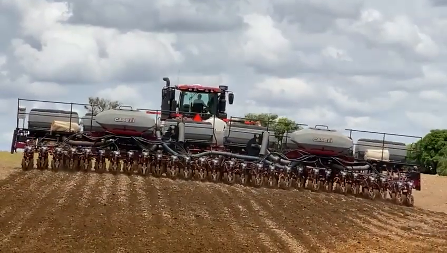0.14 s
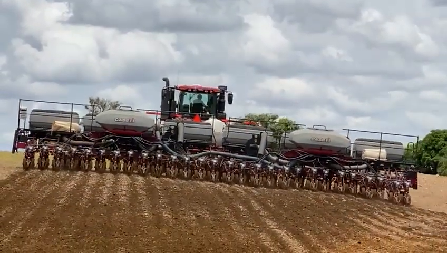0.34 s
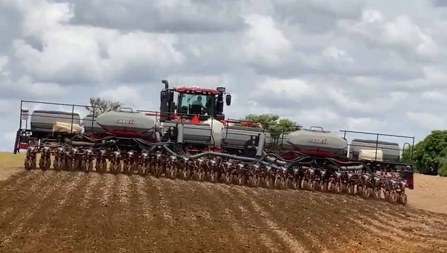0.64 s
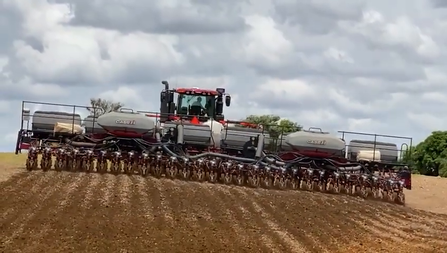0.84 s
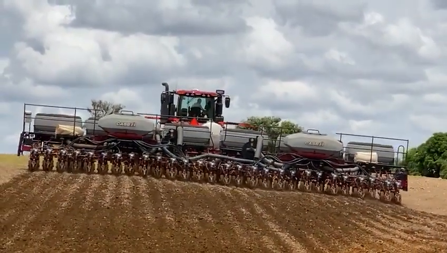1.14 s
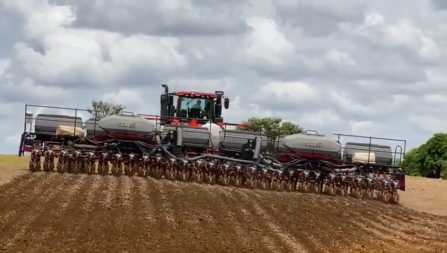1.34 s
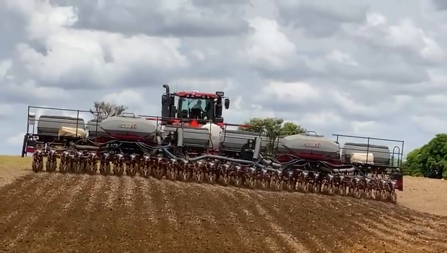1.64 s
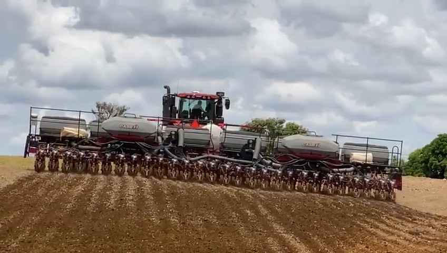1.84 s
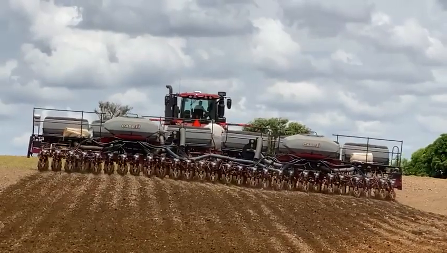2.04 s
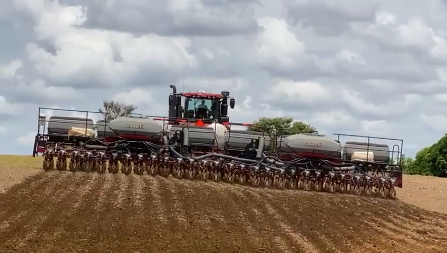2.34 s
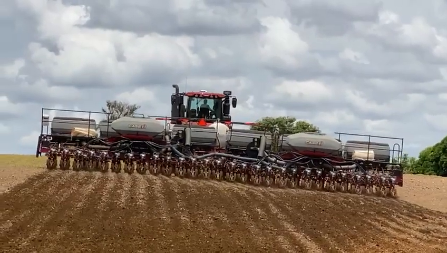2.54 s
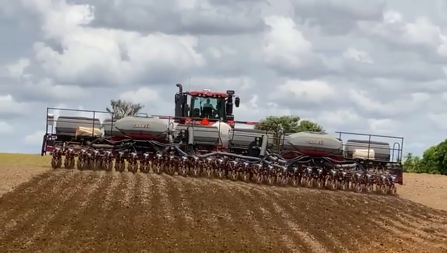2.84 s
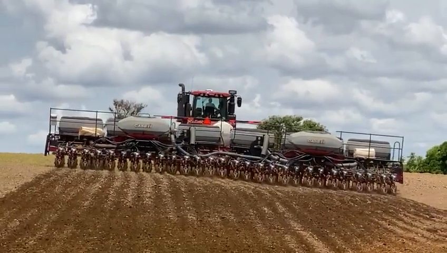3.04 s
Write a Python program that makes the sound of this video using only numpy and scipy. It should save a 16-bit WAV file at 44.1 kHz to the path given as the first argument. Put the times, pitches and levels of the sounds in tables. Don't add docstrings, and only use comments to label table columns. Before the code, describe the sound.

Tractor-drawn planter drones away across a field, fan drives whining and beating amid disc squeaks

```python
import sys
import numpy as np
from scipy import signal
from scipy.fft import rfft, irfft
from scipy.io import wavfile
from scipy.ndimage import uniform_filter1d

SR = 44100
rng = np.random.default_rng(int(sys.argv[2]) if len(sys.argv) > 2 else 0)


def linear_from_db(decibels):
    return 10 ** (np.asarray(decibels, float) / 20)


def store_pcm(level_fs):
    pcm = np.round(np.clip(level_fs, -1, 1) * 32767).astype(np.int16)
    wavfile.write(sys.argv[1], SR, np.atleast_2d(pcm).T)


N = 141120
T = np.arange(N) / SR
HZ = np.fft.rfftfreq(N, 1 / SR)

# start in seconds, length in seconds.
GUSTS_S = [
    (0.067, 0.032),
    (0.555, 0.22),
    (0.95, 0.11),
    (1.227, 0.2),
    (1.652, 0.673),
    (2.482, 0.37),
    (2.978, 0.14),
]
# frequency in Hz, density in dB per Hz.
RUMBLE_HZ_DB = [(22, -94), (40, -66.5), (62, -60.5), (110, -57), (170, -58.5), (240, -64), (310, -72),
                (390, -77)]
# multiple of the four-stroke cycle rate, level in dB rms.
EXHAUST_ORDER_DB = [(4, -58), (6, -38), (7, -47), (9, -46.5), (13, -57)]
# start in seconds, frequency in Hz, peak in dB, length in seconds.
BUMPS = [
    (.075, 90, -27, .03),
    (2.002, 74, -25, .065),
    (2.105, 85, -28, .035),
    (2.055, 60, -29, .05),
    (2.26, 90, -28, .025),
    (2.31, 90, -28, .025),
    (2.385, 80, -28, .035),
]
# time in seconds, level of the rush in dB.
RECEDE_S_DB = [(0.0, -36), (2.35, -39.5), (3.2, -38.5)]
# frequency in Hz, density in dB per Hz.
ROAR_HZ_DB = [(390, -80.5), (480, -70), (750, -69), (930, -71), (1030, -67.5), (1250, -69), (1400, -63),
              (1470, -76)]
# frequency in Hz, density in dB per Hz.
HISS_HZ_DB = [(1470, -78.5), (1570, -69.5), (1800, -70), (2150, -70.5), (2500, -75), (4000, -78),
              (6000, -81), (7900, -85)]
# centre in Hz, width in Hz, level in dB
CHATTER = [(3510, 370, -51.5), (2950, 370, -53), (1597, 87, -48), (1036, 42, -53)]
# start in seconds, length in seconds, pitch in Hz, peak in dB.
DISC_SQUEAKS = [(0.232, 0.076, 4870.0, -41), (0.299, 0.05, 3480, -34.5), (0.351, 0.031, 2825.0, -37),
                (0.374, 0.071, 3180, -35), (0.377, 0.07, 6470, -41.5), (0.409, 0.114, 3500, -36.5),
                (0.496, 0.036, 7088.0, -38), (0.743, 0.043, 6900, -41), (0.83, 0.065, 4950, -31.5),
                (0.923, 0.055, 4330, -40), (0.946, 0.066, 3568.0, -38), (1.045, 0.049, 3300.0, -36.5),
                (1.054, 0.04, 6742.0, -44), (1.07, 0.051, 3480, -27.5), (1.202, 0.039, 2980, -35),
                (1.472, 0.064, 2990, -33.5), (1.489, 0.11, 4975.0, -43), (1.521, 0.055, 3420, -35),
                (1.55, 0.051, 6120, -37.5), (1.66, 0.027, 3447.0, -33.5), (1.794, 0.052, 3370, -37.5),
                (1.797, 0.035, 6760, -43), (1.855, 0.067, 3360, -38.5), (2.514, 0.038, 6120, -42),
                (2.612, 0.046, 4920, -42), (2.644, 0.044, 3300, -36.5), (2.694, 0.052, 4020, -44),
                (2.72, 0.069, 3360, -37.5), (3.039, 0.053, 4830, -43), (3.053, 0.067, 3420, -38.1),
                (0.067, 0.037, 3300, -35.5), (0.104, 0.051, 3410, -38), (0.164, 0.041, 3350, -41),
                (0.264, 0.056, 3300, -39), (.335, .04, 5350, -44), (.415, 0.038, 6600, -41),
                (.5, 0.045, 3440, -32.5), (.6, 0.05, 2950, -53), (1.056, 0.1, 2950, -41),
                (1.123, 0.068, 3380, -37), (1.175, 0.046, 3560, -41), (1.214, 0.063, 3280, -40),
                (1.291, 0.029, 3330, -39.5), (1.6, 0.055, 3490, -39.5), (1.963, 0.033, 3330, -42),
                (2.089, 0.052, 3450, -38.5), (2.157, 0.049, 3330, -39), (2.393, 0.055, 3425, -43),
                (3.157, 0.034, 7400, -47)]
# start in seconds, length in seconds, pitch in Hz, peak in dB.
LOW_SQUEAKS = [(0.036, 0.046, 2650, -35.5), (0.067, 0.026, 2990, -37), (.375, .03, 3509, -36),
               (.375, .05, 2820, -40), (.835, 0.052, 2971, -43), (.92, 0.045, 3423, -39),
               (1.108, 0.048, 3057, -40), (1.295, .03, 2756, -52), (1.42, .05, 3550, -40.5),
               (1.563, .035, 3460, -43), (1.693, .05, 3350, -39), (1.825, .03, 3509, -40),
               (2.1, .035, 3531, -51), (2.175, .03, 2928, -47), (2.37, .03, 3746, -41),
               (2.549, 0.037, 3574, -38), (2.554, 0.033, 3294, -42), (2.601, 0.057, 3402, -37.5),
               (2.743, .03, 2950, -46), (2.79, 0.038, 3510, -47), (2.795, .035, 3014, -40),
               (2.802, 0.041, 3270, -44), (2.895, 0.048, 3370, -40), (3.012, 0.032, 3445, -48)]
# start in seconds, length in seconds, pitch in Hz, peak in dB.
HIGH_SQUEAKS = [(.155, .035, 5700, -44), (0.187, 0.033, 5404, -40.5), (.372, .045, 5641, -44),
                (.377, 0.046, 6244, -43), (.402, .035, 7000, -42), (0.48, .05, 7299, -51),
                (.5, .03, 6761, -48), (0.693, 0.025, 4000, -44), (.77, 0.027, 4866, -49),
                (1.663, 0.032, 6800, -49), (2.53, 0.065, 5297, -43), (2.618, 0.041, 5260, -44),
                (2.67, .025, 4970, -47), (2.72, .03, 4823, -46), (2.794, .035, 6800, -45),
                (3.056, 0.037, 6847, -47), (3.152, .04, 5146, -45)]
# frequency in Hz, level at start in dB, level at end in dB, unsteadiness in dB.
WHINES = [(62, -51, -50, 3), (161.6, -47, -48, 1.5), (186, -51, -51, 2), (746, -53, -63, 3),
          (1292.5, -49, -54, 3), (1357, -55, -52, 3), (4972, -64, -68, 4), (7100, -66, -71, 4)]
# time in seconds, piston rate in Hz, overtone change in dB, fundamental change in dB.
DRIVE_A = [(0, 702.7, -.5, 2), (.6, 702.3, -.5, 1.5), (1.2, 701.85, 0, 0), (1.8, 701.8, 0, 0),
           (1.95, 702.2, -1, -.5), (2.15, 702.5, -3.5, -.5), (2.45, 703.1, -5.5, -3), (2.75, 703.3, -6, -8),
           (3.2, 703.7, -8.5, -13)]
# time in seconds, rate above the first in Hz, overtone and fundamental change in dB.
DRIVE_B = [(0, 8.1, -10, 2), (.35, 7.9, -9, 2), (.8, 7.7, -9, 0), (1.1, 8, -9, -1), (1.3, 8, -6, 0),
           (1.45, 8, -12, -3), (1.7, 8, -18, -4), (1.8, 8, 2.5, -3), (2.1, 8, 1.5, -1), (2.38, 8, -2, -2),
           (2.48, 8, -11, -3), (2.58, 8, -3, -2), (2.92, 8, -4.5, -1), (3.05, 8, -14, -4)]
# time in seconds, rate above the first in Hz, the same two changes in dB.
DRIVE_C = [(0, 10.05, -10, -9), (.95, 9.9, -9, -9), (1.1, 9.3, -9, -9), (1.35, 9.3, -10, -9),
           (1.5, 9.3, -30, -20)]
# multiple of the piston rate, level in dB rms,
# share of the overtone change, share of the fundamental change.
A_TONES = [(1, -41, 0, 1), (2, -33.7, .95, 0), (3, -43.5, .9, .45), (4, -59, .9, 0), (5, -60, .9, 0)]
# multiple, level in dB rms, share of the overtone and fundamental change.
B_TONES = [(1, -48, 0, 1), (2, -40.5, 1, 0), (3, -59, .6, 0)]
# frequency in Hz, gain in dB.
COPY_GAIN_HZ_DB = [(7900, -21.5), (8600, -19), (9000, -26), (9600, -20), (10300, -19), (11000, -23),
                   (11150, -27.5), (12200, -15)]


def in_time(rows):
    s, *columns = np.transpose(rows)
    return [np.interp(T, s, c) for c in columns]


def at_hz(points, outside_db):
    f, db = np.transpose(points)
    return np.interp(np.log(HZ + 1), np.log(f), db, left=outside_db, right=outside_db)


def drift(rate_hz):
    r = np.exp(-80 * np.pi * rate_hz / SR)
    noise = rng.standard_normal(N // 40 + 2002)
    slow = signal.lfilter([1], [1, -2 * r, r * r], noise)[2000:]
    return np.interp(np.arange(N) / 40, np.arange(len(slow)), slow / slow.std())


def band(x, low_hz, high_hz):
    return signal.sosfilt(signal.butter(3, [low_hz, high_hz], "band", fs=SR, output="sos"), x)


def narrow(x, low_hz, high_hz):
    rise = np.clip((HZ - low_hz) / 40 + .5, 0, 1) ** 2
    fall = np.clip((high_hz - HZ) / 40 + .5, 0, 1) ** 2
    return irfft(rfft(x) * rise * fall, N)


def tone(hz, db, flutter_db, rate_hz, start_turn=None):
    start = rng.random() if start_turn is None else start_turn
    phase = 2 * np.pi * (np.cumsum(hz + 0 * T) / SR + start)
    phase = phase + 0.061 * flutter_db * drift(rate_hz)
    return np.sqrt(2) * linear_from_db(db + flutter_db * drift(rate_hz)) * np.sin(phase)


def air(spectrum, patchy_db, rate_hz):
    f = np.array(spectrum)[:, 0]
    shaped = rfft(rng.standard_normal(N)) * linear_from_db(at_hz(spectrum, -200)) * np.sqrt(SR / 2)
    third = 3 * np.log2((HZ + 1) / f[0])
    together = drift(4.3)
    out = np.zeros(N)
    for k in range(int(3 * np.log2(f[-1] / f[0])) + 2):
        piece = irfft(shaped * np.clip(1 - abs(third - k), 0, 1), N)
        out += piece * linear_from_db(patchy_db * (0.34 * together + drift(rate_hz)))
    return out


def breeze(engine_sound):
    gusts = sum(1. * (T > s) * (T < s + length_s) for s, length_s in GUSTS_S)
    gusts = uniform_filter1d(gusts, SR // 40)
    rumble = air(RUMBLE_HZ_DB, 1, 5) + .5 * engine_sound
    return gusts * linear_from_db(-18 + 3 * drift(4)) * narrow(rumble, 25, 290)


def engine():
    cycle_hz = 14.2
    out = air(RUMBLE_HZ_DB, 1.0, 1.7)
    for order, db in EXHAUST_ORDER_DB:
        out += tone(order * cycle_hz, db, 1.0, 3.0)
    for s, hz, db, length_s in BUMPS:
        u = np.clip((T - s) / length_s, 0, 1)
        out += linear_from_db(db) * np.sin(np.pi * u) ** 2 * np.sin(2 * np.pi * hz * (T - s))
    return out


def faint_squeaks():
    per_s, base_db = 60, -50
    when, length, pitch, level = rng.random((4, int(per_s * T[-1])))
    length_s = .03 + .05 * length
    hz = 3220 * 2.2 ** (.15 * pitch + .85 * pitch ** 9)
    db = base_db - 3 * when + 6 * level - 10 * pitch ** 3
    return np.c_[when * T[-1], length_s, hz, db]


def chatter(level_db):
    out = np.zeros(N)
    for hz, width_hz, db in CHATTER:
        ring = band(rng.standard_normal(N), hz - width_hz / 2, hz + width_hz / 2)
        out += linear_from_db(db + .5 * level_db + 2.3 * drift(5.5) + 1.9 * drift(13.5)) * ring / ring.std()
    return out


def discs(level_db):
    trim_db, rough, peak_at = -1.5, .27, .52
    wander_share, arch_per_s, sag = .007, .12, .005
    off_centre_share = .48
    skew = np.log(.5) / np.log(peak_at)
    loud = DISC_SQUEAKS
    squeaks = [*loud, *LOW_SQUEAKS, *HIGH_SQUEAKS, *faint_squeaks()]
    out, off = np.zeros(N), np.zeros(N)
    wander, grit = drift(16.8), drift(100.0)
    wander = wander - wander.mean()
    for k, (s, length_s, hz, db) in enumerate(squeaks):
        a, b = int(s * SR), min(int((s + length_s) * SR), N)
        at = (np.arange(a, b) + k * 9973) % N
        arch = np.sin(np.pi * np.linspace(0, 1, b - a) ** skew)
        bend = wander_share * wander[at] + arch_per_s * length_s * (arch - .8)
        bend = bend - sag * np.linspace(-.5, .5, b - a)
        level = linear_from_db(db + trim_db) * arch ** 0.7 * (1 + rough * grit[at])
        squeak = level * np.sin(2 * np.pi * np.cumsum(hz * (1 + bend)) / SR)
        out[a:b] += squeak
        if k < len(loud) and hz < 6300 and rng.random() < off_centre_share:
            off[a:b] += squeak
    return out + chatter(level_db), signal.hilbert(off).imag


def whines():
    return sum(tone(hz, a + (b - a) * T / T[-1], unsteady_db, 3.4) for hz, a, b, unsteady_db in WHINES)


def fan_drives():
    out = np.zeros(N)
    first_hz = 0
    drives = (DRIVE_A, A_TONES, 0), (DRIVE_B, B_TONES, -.11), (DRIVE_C, B_TONES, -.12)
    for k_drive, (curve, tones, turn) in enumerate(drives):
        hz, over_db, low_db = in_time(curve)
        hz = hz + first_hz
        if k_drive == 0:
            first_hz = hz
        for k, db, over_share, low_share in tones:
            level_db = db + over_share * over_db + low_share * low_db
            out += tone(k * hz, level_db, .55 * k, 7.0, k * turn)
    return out


def fan_width(mid, other_air, level_lag_s=.0006):
    late = np.roll(mid, int(level_lag_s * SR))
    mixed = linear_from_db(-9) * other_air + linear_from_db(-18) * late
    wide = narrow(linear_from_db(2.5 * drift(3.9)) * mixed, 1140, 1455)
    return wide + .4 * narrow(mid, 1270, 1315)


def scene():
    level_db, = in_time(RECEDE_S_DB)
    level_db = level_db - level_db.mean()
    roar, other_air = (linear_from_db(0.87 * level_db) * air(ROAR_HZ_DB, 0.31, 10.0) for _ in range(2))
    hiss = linear_from_db(level_db) * air(HISS_HZ_DB, 1.0, 9.3)
    engine_sound = engine()
    squeaks, off_centre = discs(level_db)
    mid = engine_sound + roar + hiss + squeaks + whines() + fan_drives()
    side = breeze(engine_sound) + fan_width(mid, other_air) + linear_from_db(-11) * off_centre
    return np.array([mid + side, mid - side])


def swell(x):
    power = x ** 2
    return np.sqrt(uniform_filter1d(power, int(.054 * SR)) / uniform_filter1d(power, SR // 2) + 1e-6)


def refill_top(dry):
    shift_hz, from_hz, top_edge_hz = 11 * SR / 64, 23 * SR / 128, 11910
    levelling, follow = .75, .35
    spec = rfft(dry)
    fade = np.clip((HZ - from_hz) / 90 + .3, 0, 1)
    gain_db = at_hz(COPY_GAIN_HZ_DB, -200) - .15 * np.clip(HZ - top_edge_hz, 0, None)
    moved = np.roll(spec, int(round(shift_hz * N / SR)), axis=1) * linear_from_db(gain_db) * fade
    treble = swell(narrow(dry.mean(0), 5900, 6300)) ** follow
    out = irfft(spec * (1 - fade), N)
    edges_hz = from_hz + np.array([-1, 3, 6, 7, 8, 9, 10, 14]) * SR / 128
    for low_hz, high_hz in zip(edges_hz, edges_hz[1:]):
        part = irfft(moved * (HZ >= low_hz) * (HZ < high_hz), N)
        out = out + part * treble / swell(part.mean(0)) ** levelling
    return out


def low_pass(x):
    return signal.sosfilt(signal.butter(12, 12150, fs=SR, output="sos"), x)


def record(dry):
    mix = refill_top(dry)
    return low_pass(mix)


dry = scene()
out = record(dry)
store_pcm(out)
```